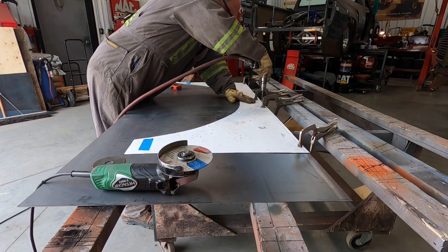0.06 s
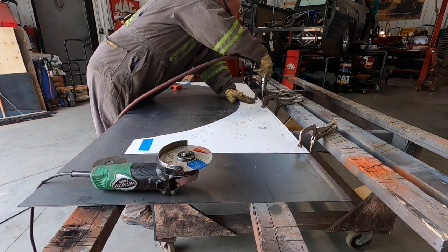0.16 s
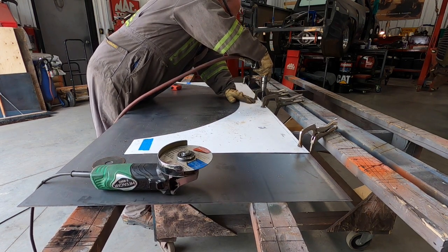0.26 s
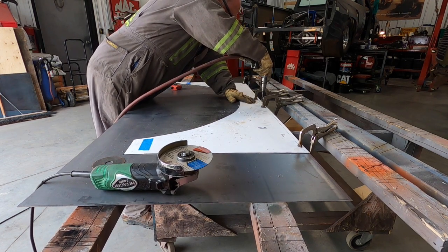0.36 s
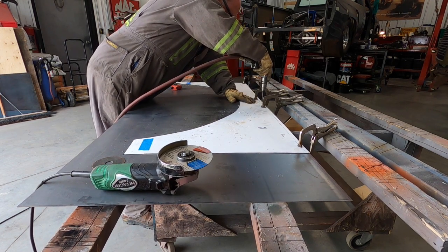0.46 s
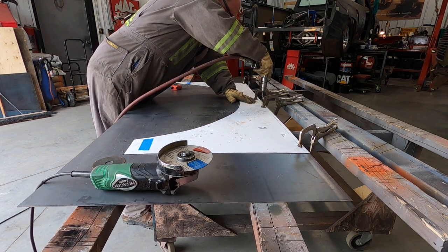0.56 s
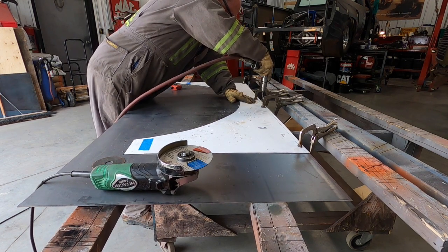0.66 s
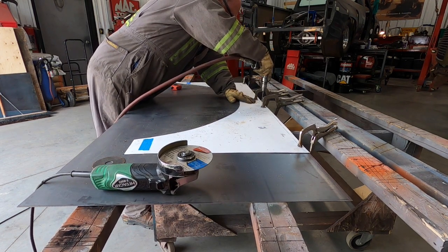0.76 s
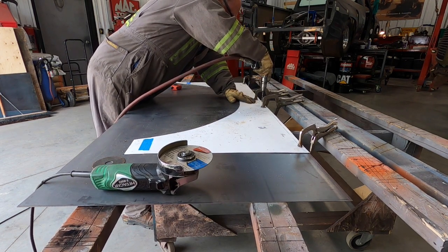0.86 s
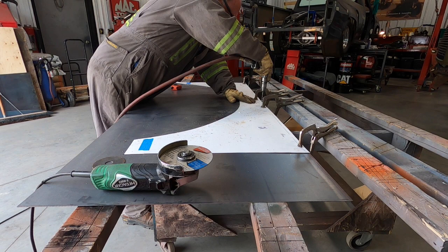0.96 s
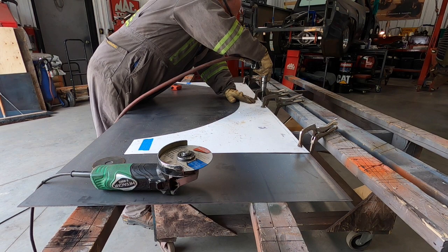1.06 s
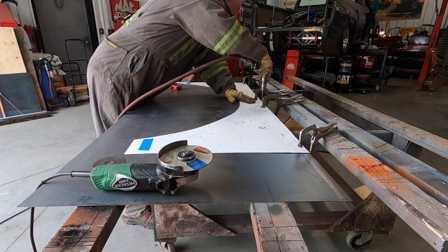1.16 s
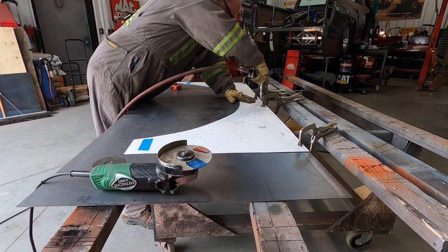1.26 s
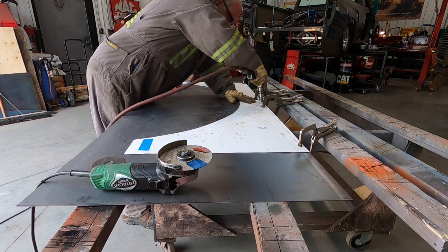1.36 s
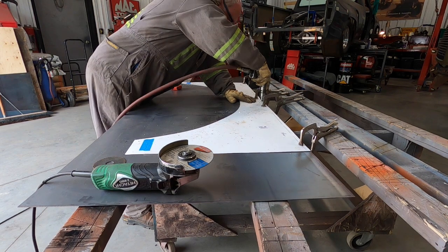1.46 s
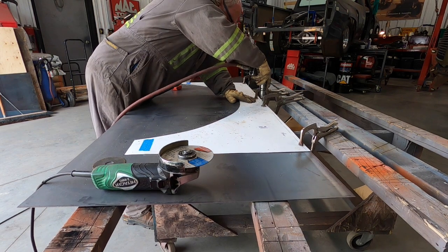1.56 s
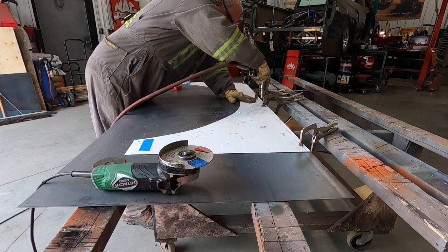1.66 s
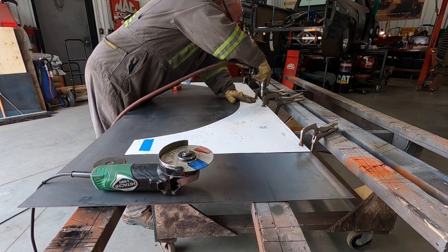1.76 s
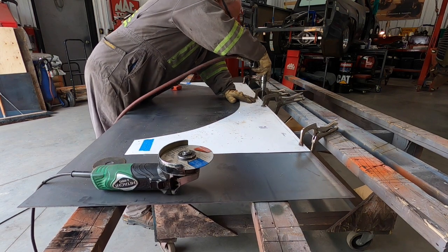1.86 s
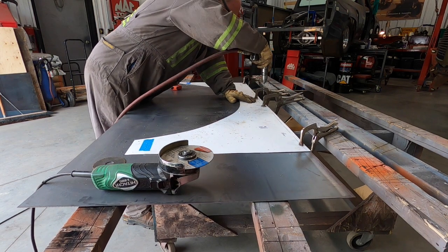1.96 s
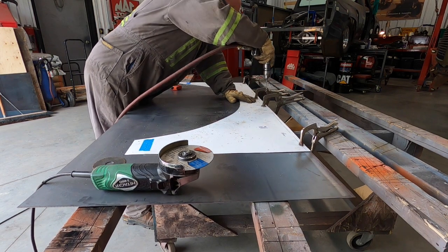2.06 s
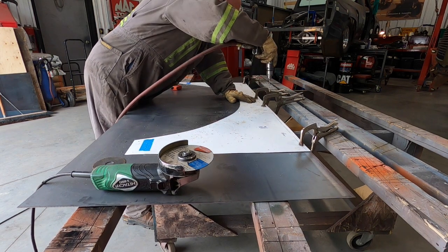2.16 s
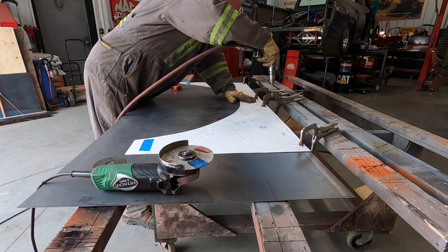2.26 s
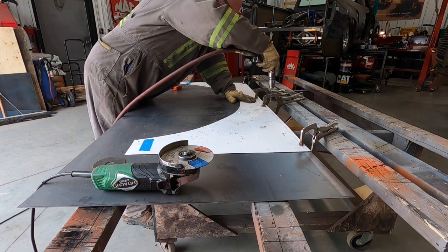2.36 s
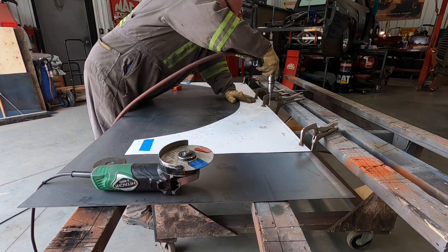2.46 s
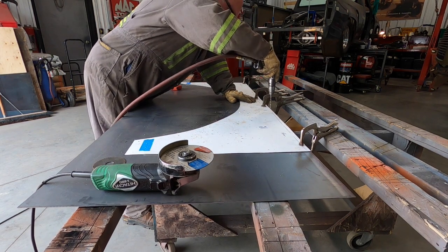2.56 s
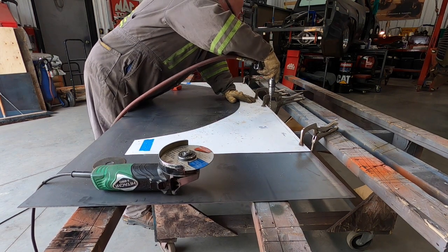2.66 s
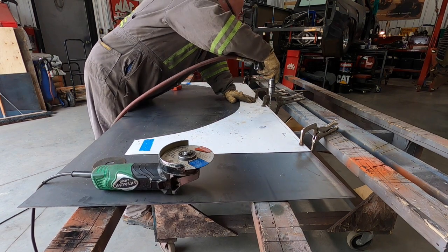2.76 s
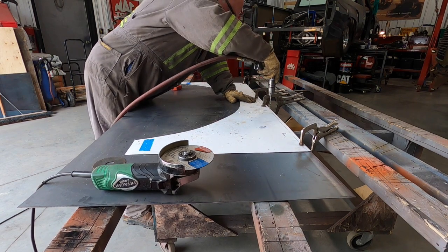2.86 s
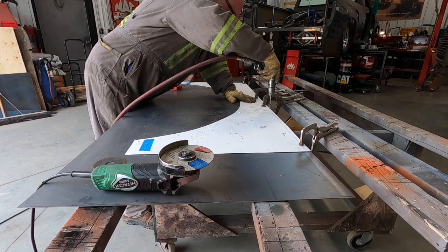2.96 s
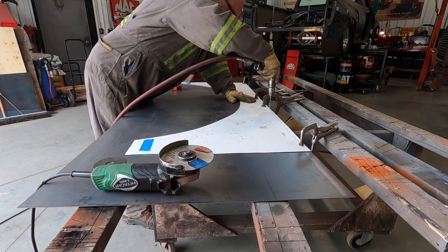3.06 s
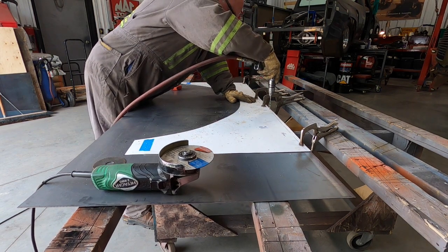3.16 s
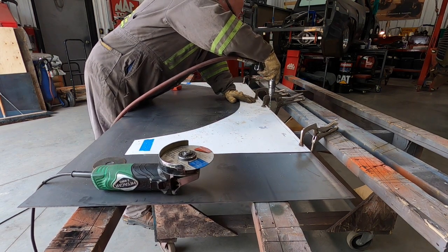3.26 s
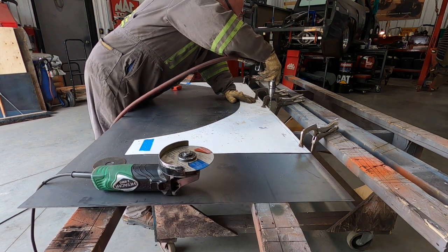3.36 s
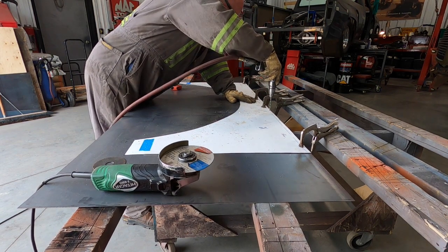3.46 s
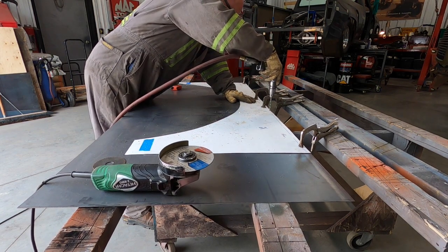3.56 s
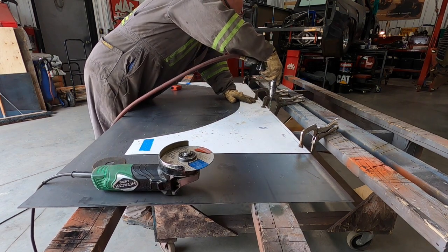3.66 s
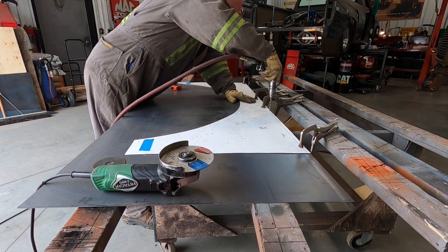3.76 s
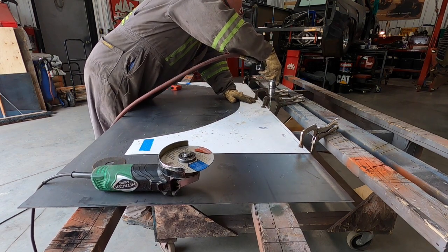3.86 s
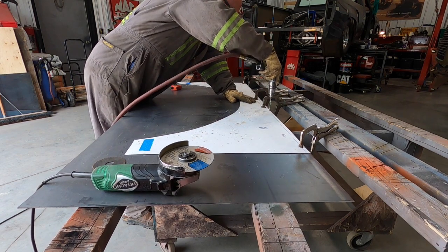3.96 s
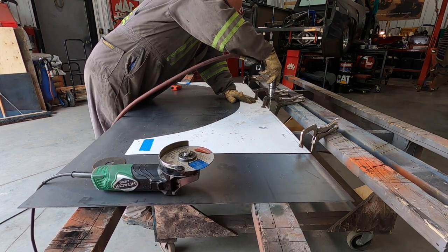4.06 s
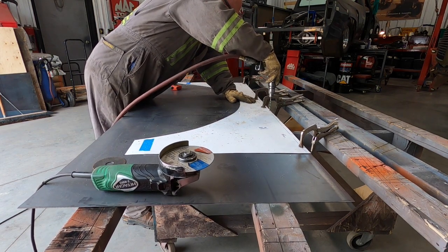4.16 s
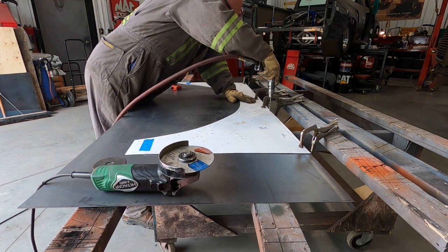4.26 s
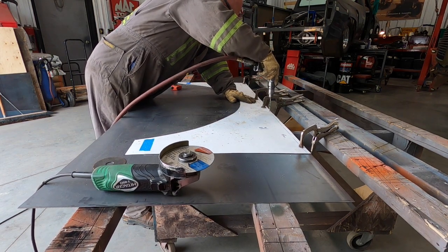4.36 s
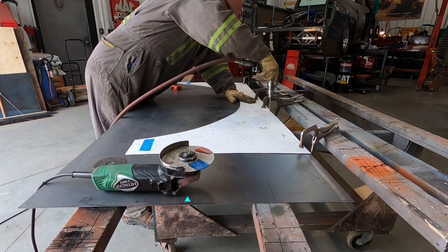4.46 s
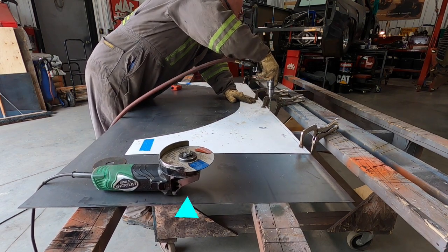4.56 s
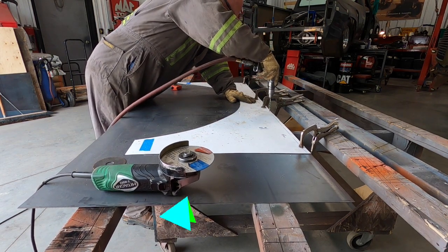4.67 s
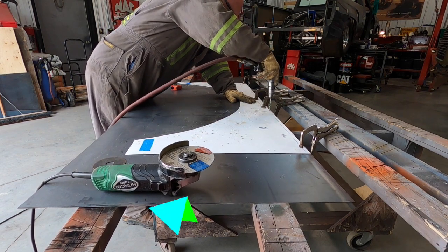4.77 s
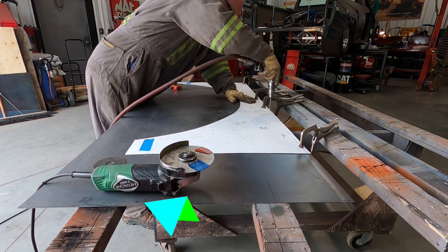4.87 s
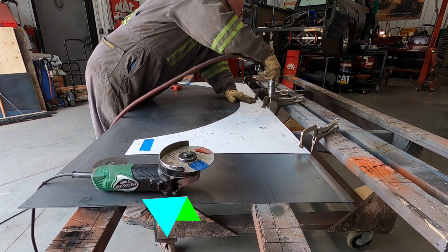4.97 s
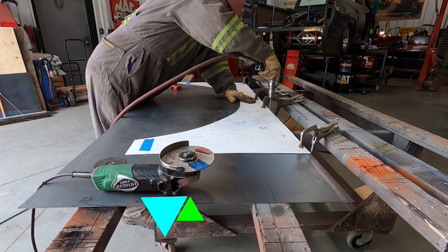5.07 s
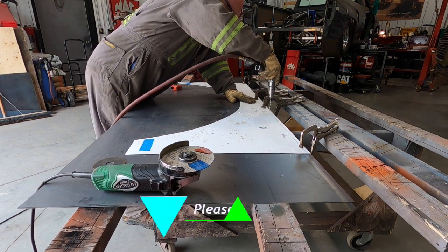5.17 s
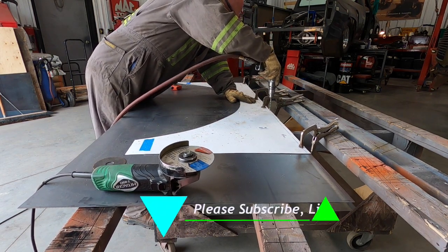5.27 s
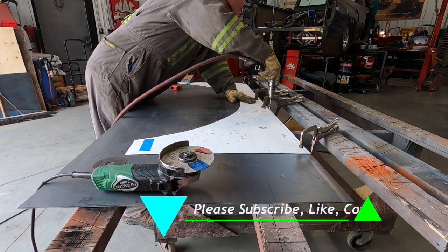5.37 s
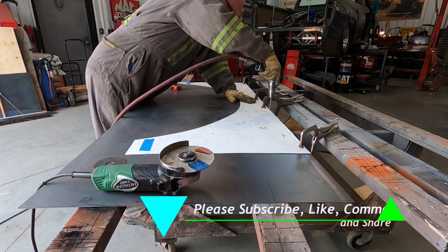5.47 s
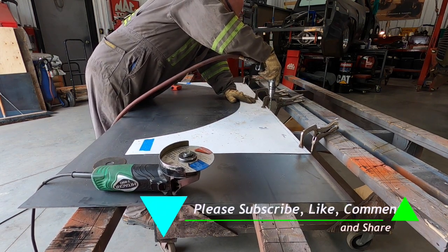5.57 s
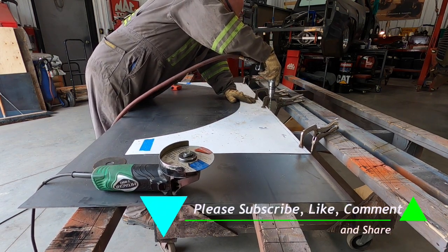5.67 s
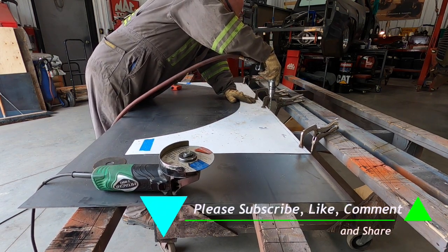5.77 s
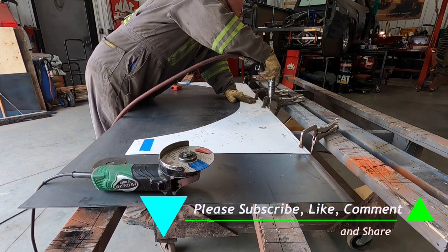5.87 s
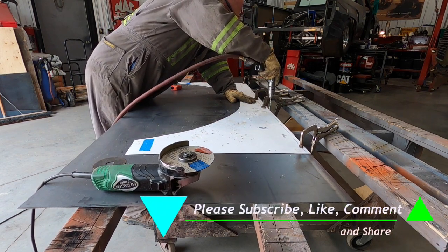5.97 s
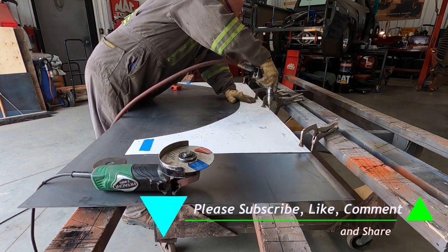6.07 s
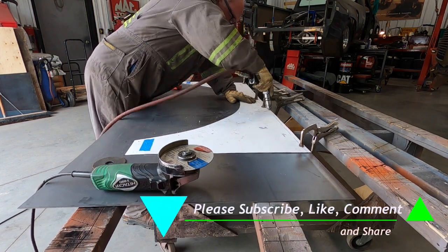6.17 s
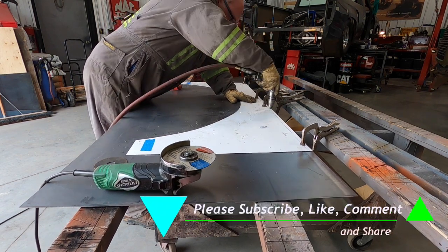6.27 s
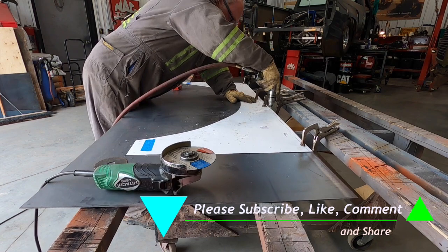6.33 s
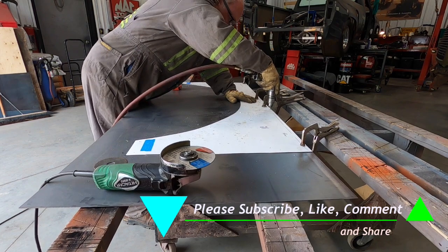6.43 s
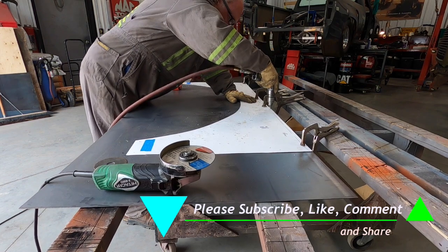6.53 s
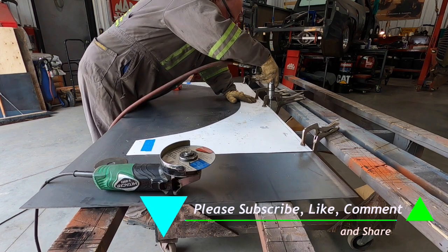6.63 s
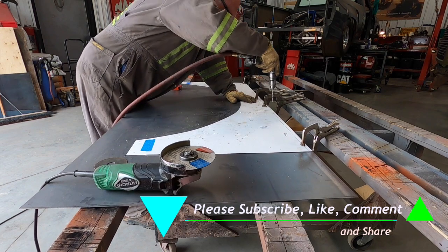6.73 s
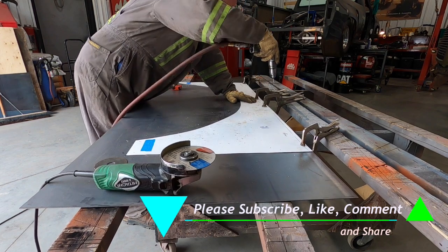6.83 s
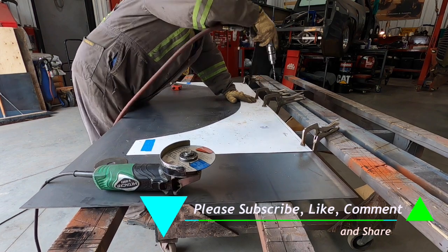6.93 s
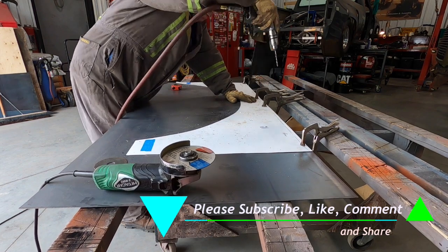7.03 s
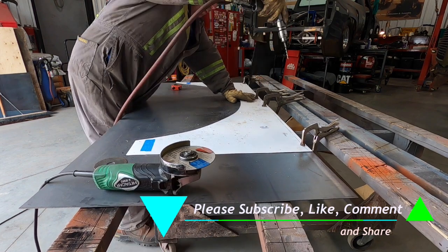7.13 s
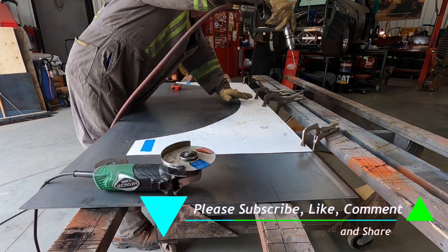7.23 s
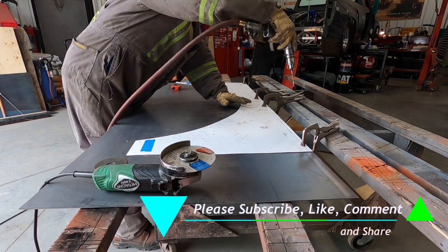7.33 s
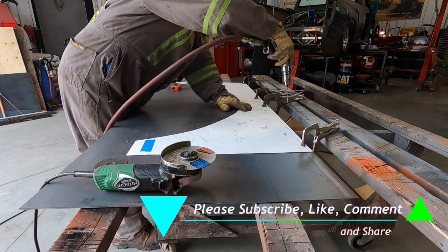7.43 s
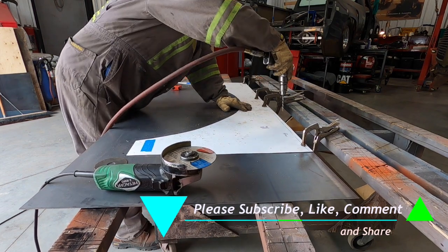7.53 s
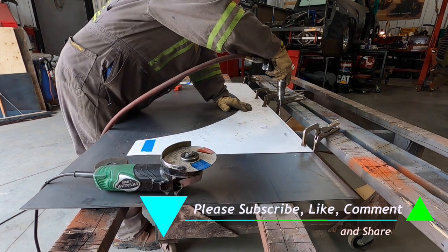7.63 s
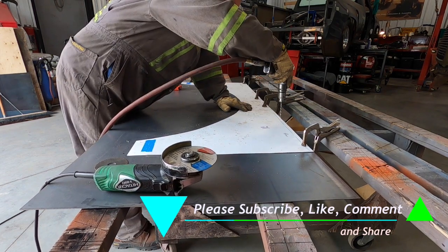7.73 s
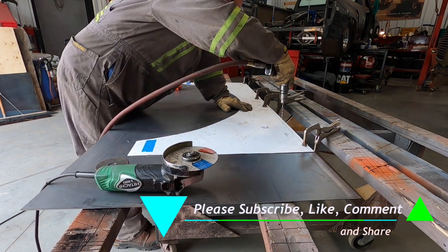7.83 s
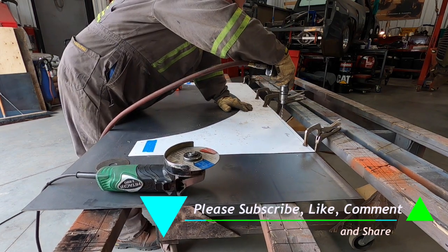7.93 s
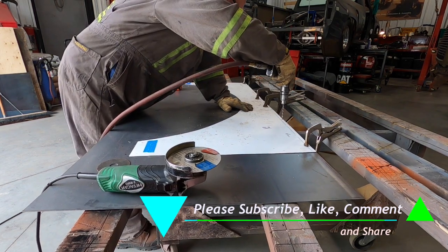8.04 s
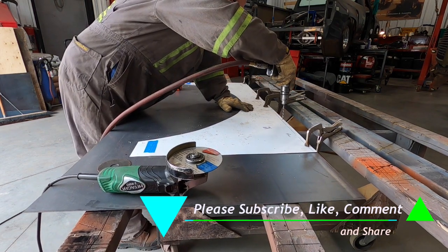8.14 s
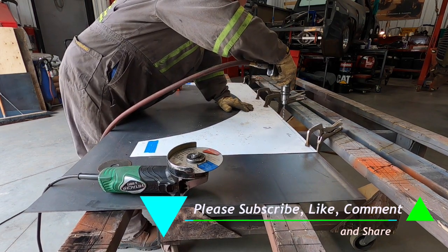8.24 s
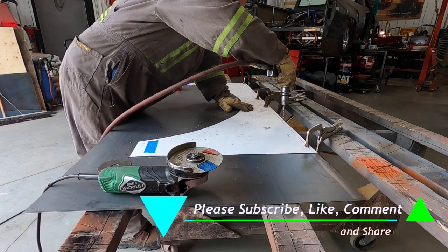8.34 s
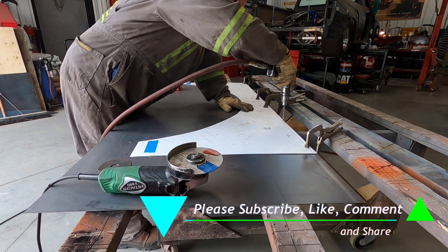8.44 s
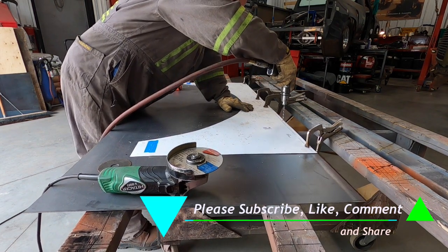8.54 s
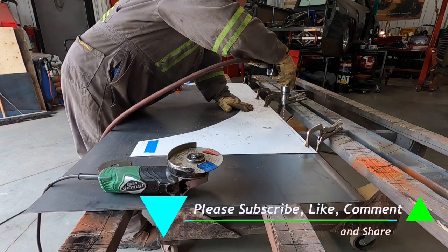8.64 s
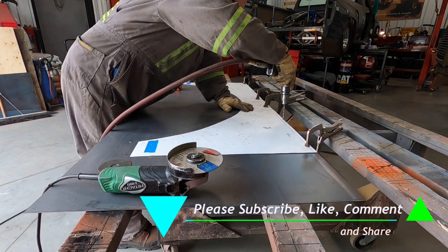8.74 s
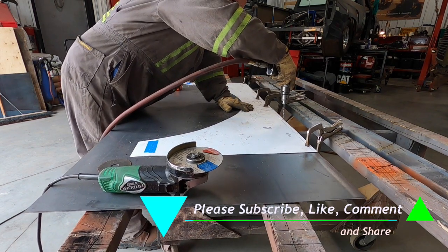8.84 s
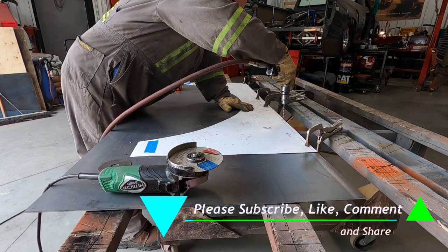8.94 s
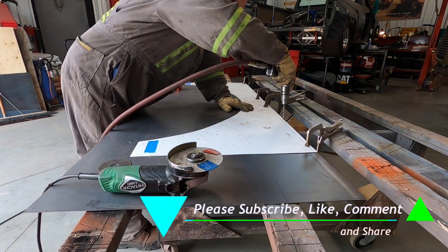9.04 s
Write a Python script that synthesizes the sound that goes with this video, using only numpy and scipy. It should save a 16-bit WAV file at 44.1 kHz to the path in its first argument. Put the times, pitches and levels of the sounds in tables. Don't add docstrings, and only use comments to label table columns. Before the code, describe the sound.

In a big, hard workshop an air drill, slightly right, is already boring steel, hissing loudly over a thin whine. The bit breaks through with a clank and scrape, and the rotor whoops down. A short blip follows, then two seconds of quieter pause with sheet knocks, another blip, a second long bore, and a last blip. Light ticks, rustles and sheet clanks end it over a faint far hum, picked up in stereo at close range.

```python
import sys
import numpy as np
from scipy import signal
from scipy.fft import rfft, irfft, next_fast_len
from scipy.io import wavfile
from scipy.ndimage import uniform_filter1d, map_coordinates

SR = 44100
rng = np.random.default_rng(int(sys.argv[2]) if len(sys.argv) > 2 else 0)


def dump_mix(stems):
    frames = np.atleast_2d(stems).T
    limited = np.clip(frames, -1, 1)
    pcm = np.round(limited * 32767).astype(np.int16)
    wavfile.write(sys.argv[1], SR, pcm)


def nominal_scale(level):
    x = np.asarray(level, float) / 20
    return 10 ** x


N = 401310
T = np.arange(N) / SR

# (valve opens [s], valve shuts [s], coasting vanes pass 1 kHz [s], hiss [dB], tool lifted [0-1])
TRIGGER = [
    (-.4, 1.58, 1.601, -21, .03),
    (1.807, 1.947, 1.970, -20.5, .95),
    (4.003, 4.116, 4.136, -20, .35),
    (4.406, 6.379, 6.399, -21, .04),
    (6.618, 6.736, 6.759, -20.5, .6),
]
# (bit bites [s], breaks through [s], first loss of vane rate [Hz], sag [Hz/s], how far through [0-1])
HOLES = [
    (-1, 1.37, 113, 22, .7),
    (4.52, 6.19, 75, 70, 1),
]
# (multiple, level [dB])
WHINE = [(1, 0), (2, -3), (4, -7), (5, -11)]
# (multiple, level [dB])
WHOOP = [(2, -6), (3, -11)]
# (frequency [Hz], level [dB])
HOUSING = [(60, -46), (180, -20), (260, -15), (380, -13), (570, -3.5), (830, -1), (930, 2.5), (1150, .5),
           (1350, -2), (1500, -12)]
# (centre [Hz], width [Hz])
CHAMBER = (2350, 330)
# (frequency [Hz], density [dB per Hz])
HISS_CUTTING = [(70, -20), (245, -14), (860, -21), (930, -15), (1640, -11.5), (1880, -12), (2300, -2.5),
                (3050, -2.5), (3750, -5), (4050, -9.5), (5050, -9.5), (5500, -1.5), (6500, -6),
                (7500, -12.5)]
# (frequency [Hz], added to its last density [dB])
HISS_TOP = [(7500, 0), (8000, 1), (8700, 5), (9700, -2), (10500, -4.5), (12000, -7.5), (14000, -16.5),
            (15800, -34)]
# (frequency [Hz], density [dB per Hz])
HISS_THROUGH = [(290, -6), (500, 7.5), (917, 1.5), (1520, 9), (2210, 4.5), (3420, 9.5), (7350, 2),
                (12400, -7), (14300, -26.5), (15800, -41)]
# (frequency [Hz], density [dB per Hz])
HISS_LIFTED = [(88, -26.5), (150, -3), (249, -9), (817, -19.5), (1230, -20), (1470, -5), (2120, -8),
               (3020, 0), (4280, -6), (6080, -7), (9900, -13), (13800, -26), (15800, -47)]

# (time [s], level [dB], rise [s per 20 dB], fall [s per 20 dB])
SHUDDER = [(.116, -48, .04, .1), (1.372, -26, .012, .2), (1.46, -22, .13, .13), (1.67, -33, .2, .35),
           (2.01, -28, .12, .25), (2.55, -50, .1, .3), (3.36, -59, .03, .1), (3.478, -33, .02, .25),
           (4.0, -33, .05, .17), (4.21, -32, .03, .06), (4.4, -38, .015, .12), (6.25, -20, .06, .3),
           (6.35, -22, .15, .25), (6.75, -38, .03, .08), (6.84, -41, .05, .2), (7.27, -48, .6, .1),
           (7.295, -31, .02, .3), (7.62, -38, .2, .35), (8.24, -63, .02, .1), (8.42, -51, .012, .15),
           (8.515, -33, .015, .25), (8.64, -39, .3, .1), (8.935, -40, .06, .27)]
# (time [s], level [dB], rise [s per 20 dB], fall [s per 20 dB])
BURR = [
    (1.43, -28.5, .08, .45),
    (6.245, -24.5, .07, .7),
]
# (frequency [Hz], width [Hz], level [dB])
SHEET_MODES = [(95, 63, -4.5), (134, 23.8, 3.5), (173, 23, 0), (219, 37, 0), (273.8, 19, 2),
               (356, 170, -13.5)]
# (frequency [Hz], density [dB per Hz])
CLANK = [(180, -30.5), (300, -2.5), (396, -3.5), (541, -1.5), (814, -0.5), (1570, 0), (2200, -7),
         (2600, -11), (3330, -16), (15000, -48)]
# (frequency [Hz], t60 [s])
CLANK_T60 = [(300, 0.6), (1500, 0.17), (5000, 0.28), (12000, 0.12)]
# (time [s], rms level at the start [dB], ring scale)
KNOCKS = [(1.372, -28, .2), (1.428, -21, 0.39), (3.474, -31, 1), (3.535, -46.5, 0.26), (6.241, -20, 0.45),
          (7.288, -34.5, .55), (7.304, -36.5, 0.51), (8.239, -51, .5), (8.40, -63, .45), (8.513, -29, .9),
          (8.522, -35.5, 0.7), (8.545, -34, .25), (8.922, -41, 0.9), (8.931, -39, .6)]

# (time [s], level [dB], frequency [Hz], t60 [s])
TICKS = [(2.01, -27, 280.3, 0.55), (3.14, -62, 600, .1), (3.33, -56.5, 314, 0.31),
         (3.985, -27.5, 768, 0.021), (4.005, -24.5, 2476, 0.1), (6.24, -22, 1580, .07),
         (6.33, -23, 285.3, 0.68), (8.517, -27, 1397, 0.079), (7.236, -53, 7000, .011),
         (7.29, -32, 5500, .031), (7.292, -32.5, 2630, 0.042), (7.34, -28, 3900, .005),
         (7.339, -31, 2890, .008), (7.445, -48.5, 6000, 0.0098), (7.57, -44, 7030, .011),
         (7.76, -49.5, 2450, .011), (7.825, -57, 3500, .011), (8.075, -60, 8000, 0.029),
         (8.168, -73, 7880, .011), (8.213, -64, 3600, .012), (8.454, -62.5, 4960, 0.012),
         (8.5, -59, 4960, .011), (2.445, -60, 8000, .01), (3.537, -50, 4200, .008),
         (3.717, -58, 8500, .012)]
# (time [s], level [dB], rise [s per 20 dB], fall [s per 20 dB])
RUSTLE = [
    (7.18, -52, .25, .4),
    (7.42, -54, .5, .6),
    (7.57, -48, .15, .15),
    (7.84, -54, .8, .2),
    (8.28, -71, .6, .8),
    (8.7, -59, .6, .5),
]
# (frequency [Hz], density [dB per Hz])
CLOTH = [(240, -30), (400, -8.5), (1270, -6.5), (1520, -3.5), (2150, -13), (2510, -11), (4200, -18),
         (8690, -25.5), (15000, -49)]

# (frequency [Hz], left minus right [dB])
SHADE = [(300, -4.7), (1200, -2.8), (2400, 0), (4400, -1), (8000, -8.5), (14000, -8.5)]
# (frequency [Hz], level against direct sound [dB])
BENCH = [(300, -20), (2000, -17), (5000, -12), (9000, -7), (14000, -1)]
# (frequency [Hz], t60 [s])
HALL_T60 = [(100, 0.84), (300, .9), (600, 1.1), (1000, 1.3), (1500, 1.6), (2500, 1), (5000, 0.82),
            (12000, 0.37)]
# (frequency [Hz], level against direct sound [dB])
HALL_LEVEL = [(60, -10), (300, -9), (600, -5), (1000, -6.5), (1500, -4.5), (2500, -6.5), (6000, -10.5),
              (14000, -7.5)]
# (frequency [Hz], likeness [-1 to 1])
HALL_ALIKE = [(100, 0.92), (300, 0.94), (700, 0.76), (1500, .76), (3000, .46), (7000, 0.085)]
# (frequency [Hz], density [dB per Hz])
SHOP = [(12, -28), (25, -1), (50, 3), (65, 3), (160, -2), (250, -13), (400, -20), (630, -24), (1000, -16),
        (1600, -15), (2500, -27), (4000, -34), (8000, -42), (16000, -68)]

WHOOP_DB, PUFF_DB = -16, -30.5
SHAKE_DB, SHOP_DB = -49, -58.5
LAG_S = 3.9e-5
DRIFT_PER_S = 5


def drill():
    opening = valve()
    burst, vane_hz, lag, biting, through = motor()
    *_, hiss_db, lifted = np.transpose(TRIGGER)[:, burst]
    hiss_db = hiss_db + .8 * lag - 1.3 * through
    lifted = np.clip(lifted, 0, 1)
    turn = 2 * np.pi * np.cumsum(vane_hz * (1 + .002 * wobble(40))) / SR

    whine_db = -33.5 - 5 * lag - 4.5 * biting - 15 * through
    whine = sum(nominal_scale(db + 1.5 * wobble(30)) * np.sin(k * turn) for k, db in WHINE)
    air = exhaust(turn, lifted, through)
    sound = opening * (nominal_scale(hiss_db) * air + nominal_scale(whine_db + .6) * whine)
    add_whoops(sound, vane_hz, through)

    puff = filtered(np.gradient(opening), lambda hz: 1 / (1 + 1j * hz / 50) ** 2)
    return sound + nominal_scale(PUFF_DB) * puff / np.abs(puff).max()


def exhaust(turn, lifted, through):
    cutting = np.clip(1 - through - lifted, 0, 1)
    treble = [(hz, HISS_CUTTING[-1][1] + db) for hz, db in HISS_TOP[1:]]
    in_steel = [(35, -43.5)] + list(HISS_CUTTING) + treble
    air = np.sqrt(cutting) * hiss(in_steel, patchy_db=.9)
    air = air + np.sqrt(through) * hiss(HISS_THROUGH, patchy_db=1.0)
    air = air + np.sqrt(lifted) * hiss(HISS_LIFTED, patchy_db=2.0)
    return air * (1 + 0.18 * np.sin(turn)) * nominal_scale(0.71 * wobble(28))


def add_whoops(sound, vane_hz, through):
    flutter_db = 1.5 * wobble(90)
    centre_hz, width_hz = CHAMBER
    for _, off, pass_s, *_ in TRIGGER:
        first = round(off * SR)
        span = slice(first, round((off + 0.24) * SR))
        coast_hz = 1000 * np.exp((pass_s - T[span]) / .054)
        hz = (coast_hz ** -6. + vane_hz[span] ** -6.) ** (-1 / 6)
        phase = 2 * np.pi * np.cumsum(hz) / SR
        over_db = 3 - 11 * through[first]
        over = np.zeros(len(hz))
        for k, db in WHOOP:
            let_out = 1 / (1 + ((k * hz - centre_hz) / width_hz) ** 2) ** 2
            over += nominal_scale(db + over_db) * np.sin(k * phase) * let_out
        swell = 1 - np.exp((off - T[span]) / .008)
        note = nominal_scale(along(HOUSING, hz)) * np.sin(phase) + over
        sound[span] += nominal_scale(WHOOP_DB + flutter_db[span]) * swell * note


def valve():
    opening = np.zeros(N)
    for on, off, *_ in TRIGGER:
        opening += nominal_scale(-31) * (T < on) * np.exp(np.clip((T - on) / .018, -40, 0))
        opening += np.exp(np.clip(np.minimum((T - on) / .0033, (off - T) / .0023), -40, 0))
    return opening


def motor():
    start_hz, free_hz, spin_up_s = 1130, 1522, .034
    bite_s, grab_hz, grab_s, break_s = .15, 45, .12, .065
    opens = np.transpose(TRIGGER)[0]
    burst = np.clip(np.searchsorted(opens - .03, T) - 1, 0, None)
    lag = np.exp(-np.clip(T - opens[burst], 0, None) / spin_up_s)
    hz = free_hz - (free_hz - start_hz) * lag
    biting, through = np.zeros(N), np.zeros(N)
    for bite, out, drop_hz, sag, share in HOLES:
        same = burst == burst[round(out * SR)]
        cut_s = np.clip(T, bite, out) - bite
        load_hz = drop_hz * (1 - np.exp(-cut_s / bite_s)) + sag * cut_s
        snatch_hz = grab_hz * np.exp(-abs(T - out) / grab_s)
        hz = hz - same * (load_hz + snatch_hz)
        biting = biting + same * (T > bite) * (T < out) * sag / HOLES[-1][3]
        through = through + same * share * np.clip((T - out) / break_s, 0, 1)
    return burst, hz, lag, biting, np.clip(through, 0, 1)


def sheet():
    shake_gain = strokes(SHUDDER) + nominal_scale(SHAKE_DB) * motor()[3]
    shake = shake_gain * unit(filtered(rng.standard_normal(N), sheet_modes))
    scrape = valve() * strokes(BURR) * nominal_scale(2.8 * wobble(65)) * hiss(CLANK, patchy_db=5.0)
    return shake + scrape + clanks()


def sheet_modes(hz):
    total = 0
    for k, (centre, width, db) in enumerate(SHEET_MODES):
        damping = 1j * hz * width
        total = total + (-1) ** k * nominal_scale(db) * damping / (centre ** 2 - hz ** 2 + damping)
    return total


def clanks():
    knocks = np.zeros(N + SR)
    for s, db, ring in KNOCKS:
        hz, z = dying([(f, ring * t60) for f, t60 in CLANK_T60], length=SR // 2, channels=1)
        clank = signal.istft(z[0] * nominal_scale(along(CLANK, hz))[:, None], SR, nperseg=256)[1][:SR // 2]
        clank = clank * (1 - np.exp(-np.arange(len(clank)) / 25))
        knocks[round(s * SR):][:len(clank)] += nominal_scale(db) * clank / np.sqrt(np.mean(clank[:200] ** 2))
    return knocks[:N]


def handling():
    brush = nominal_scale(1.5 * wobble(85)) * hiss(CLOTH, patchy_db=2)
    ticks, t = np.zeros(N + SR), np.arange(SR // 4) / SR
    for s, db, hz, t60 in TICKS:
        snap = hz / 5000 * nominal_scale(-60 * t / .006) * rng.standard_normal(len(t))
        note = nominal_scale(-60 * t / t60) * np.sin(2 * np.pi * hz * t)
        ticks[round(s * SR):][:len(t)] += nominal_scale(db) * (note + snap)
    softened = filtered(ticks[:N], lambda hz: 1 / (1 + 1j * hz / 8000) ** 4)
    return strokes(RUSTLE) * brush + softened


def drill_placed(x):
    half = lambda hz: nominal_scale(along(SHADE, hz) / 2) * np.exp(-1j * np.pi * hz * LAG_S)
    scatter = rng.standard_normal((2, 2, SR // 20)) * nominal_scale(-60 * np.arange(SR // 20) / SR / .07)
    bounced = shifting(filtered(x, lambda hz: nominal_scale(along(BENCH, hz)))) / np.linalg.norm(scatter[0, 0])
    delayed = np.pad(scatter, ((0, 0), (0, 0), (40, 0)))
    near = x + signal.oaconvolve(bounced[None], delayed, axes=2).sum(axis=1)[:, :N]
    return filtered(near, lambda hz: np.array([half(hz), 1 / half(hz)]))


def steel_placed(x):
    sides = np.array([[.5], [-.5]])
    tilt = nominal_scale([[-.35], [.35]])
    return filtered(x, lambda hz: tilt * np.exp(-1j * np.pi * hz * LAG_S * sides))


def hall(x):
    _, z = dying(HALL_T60, length=2 * SR, channels=4)
    tail = signal.istft(z / np.linalg.norm(z, axis=2, keepdims=True), SR, nperseg=256)[1]
    tail = tail * (1 - np.exp(-np.arange(tail.shape[1]) / SR / 0.0078))
    tail = (tail / np.linalg.norm(tail[0])).reshape(2, 2, -1)
    late = np.pad(x, (300, 0))[:N]
    sent = shifting(filtered(late, lambda hz: nominal_scale(along(HALL_LEVEL, hz))))
    return paired(*signal.fftconvolve(sent[None], tail, axes=2).sum(axis=1)[:, :N])


def shop_hum():
    far = paired(hiss(SHOP, patchy_db=2), hiss(SHOP, patchy_db=2))
    return nominal_scale(SHOP_DB + 0.9 * wobble(3.3)) * far


def shifting(x):
    pose = 2 * wobble(DRIFT_PER_S)
    return x * np.array([np.cos(pose), np.sin(pose)])


def paired(a, b):
    turn = lambda hz: np.arccos(np.clip(along(HALL_ALIKE, hz), -1, 1)) / 2
    mid, side = filtered(np.array([a, b]), lambda hz: np.array([np.cos(turn(hz)), np.sin(turn(hz))]))
    return np.array([mid + side, mid - side])


def strokes(rows):
    power = np.zeros(N)
    for s, db, rise, fall in rows:
        power += nominal_scale(db - 20 * np.maximum((s - T) / rise, (T - s) / fall)) ** 2
    return np.sqrt(power)


def hiss(spectrum, patchy_db):
    z = signal.stft(rng.standard_normal(N), nperseg=512)[2]
    field = uniform_filter1d(rng.standard_normal(z.shape), size=5, axis=0)
    field = uniform_filter1d(field, size=8, axis=1)
    rough = signal.istft(z * nominal_scale(patchy_db * unit(field)), nperseg=512)[1][:N]
    return unit(filtered(rough, lambda hz: nominal_scale(along(spectrum, hz))))


def dying(t60, length, channels):
    hz, t, z = signal.stft(rng.standard_normal((channels, length)), SR, nperseg=256)
    return hz, z * nominal_scale(-60 * t / along(t60, hz)[:, None])


def filtered(x, response):
    m = next_fast_len(N + SR // 2)
    return irfft(rfft(x, m) * response(np.fft.rfftfreq(m, 1 / SR)), m)[..., :N]


def wobble(rate):
    return map_coordinates(rng.standard_normal(int(N * rate / SR) + 4), [T * rate])


def along(points, hz):
    f, v = np.transpose(points)
    return np.interp(np.log(hz + 1), np.log(f + 1), v)


def unit(x):
    return x / np.sqrt(np.mean(x ** 2) + 1e-20)


def scene():
    tool, steel = drill(), sheet() + handling()
    return drill_placed(tool) + steel_placed(steel) + hall(tool + .75 * steel) + shop_hum()


def top_cut(x):
    return signal.sosfilt(signal.butter(12, 16010, fs=SR, output="sos"), x)


def record(dry):
    mix = filtered(dry, lambda hz: hz < 15750)
    return top_cut(mix)


dry = scene()
out = record(dry)
dump_mix(out)
```